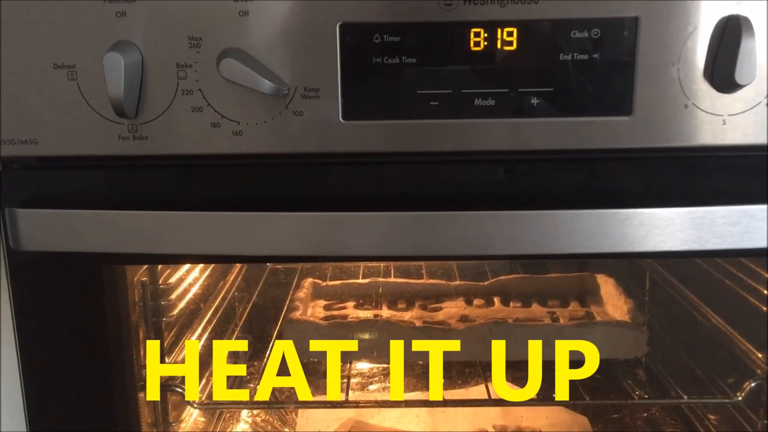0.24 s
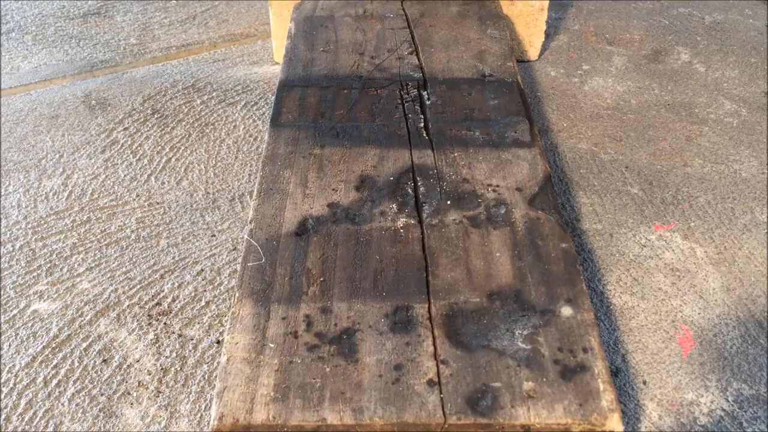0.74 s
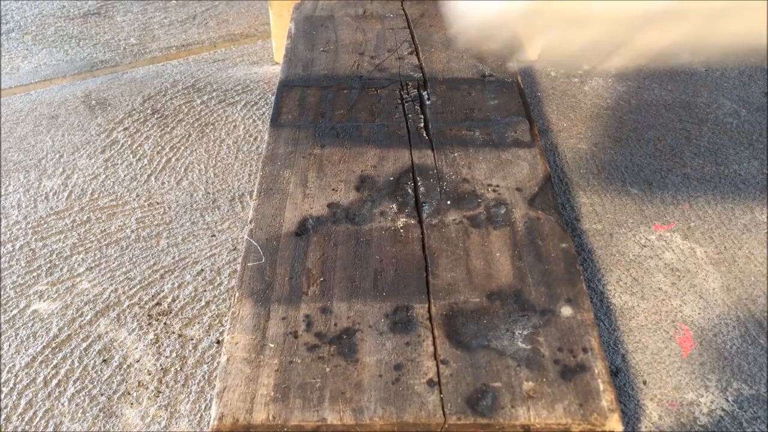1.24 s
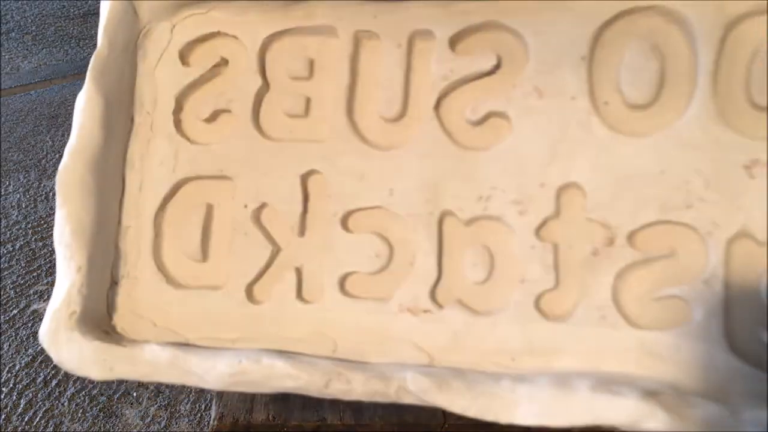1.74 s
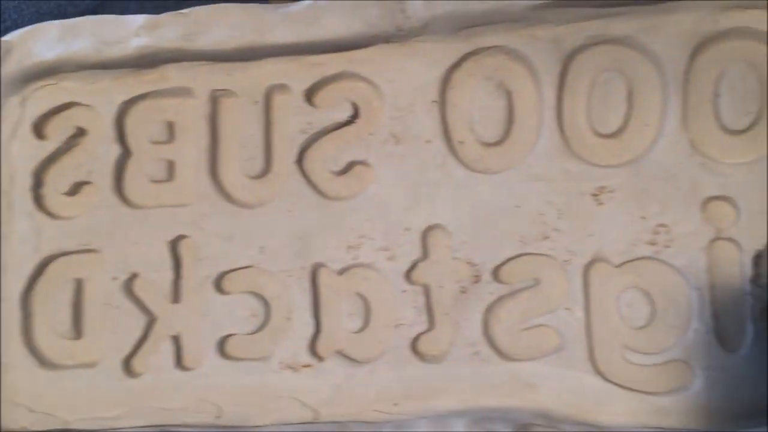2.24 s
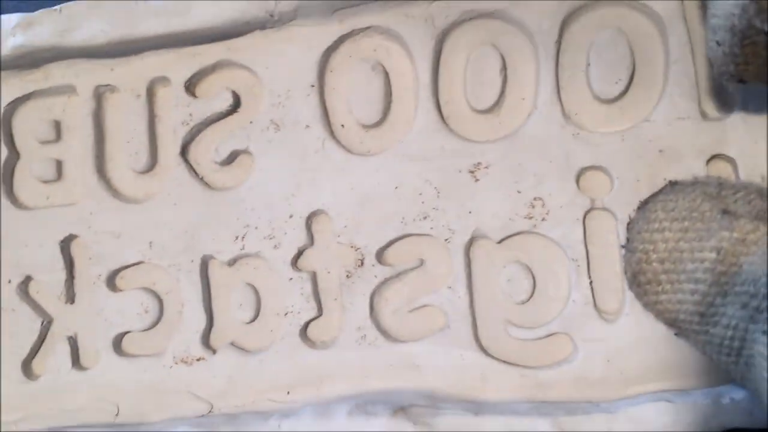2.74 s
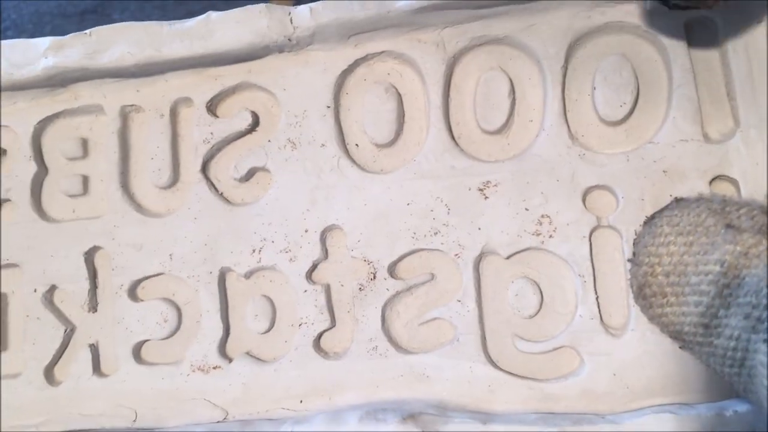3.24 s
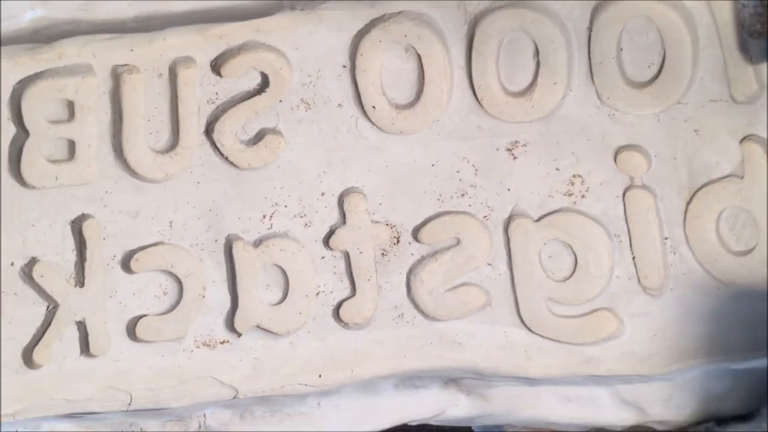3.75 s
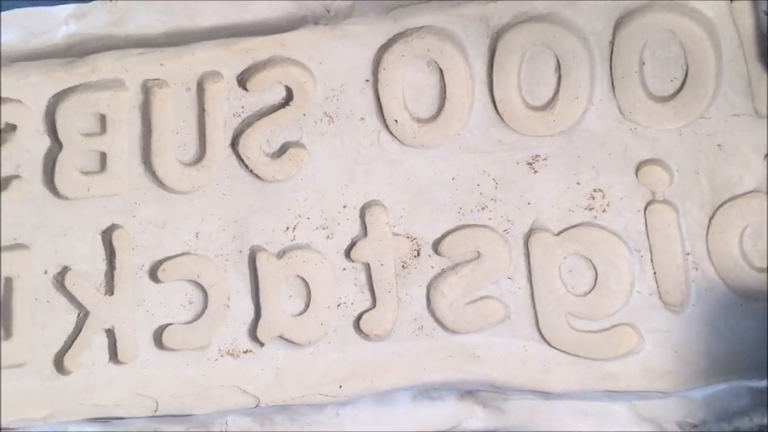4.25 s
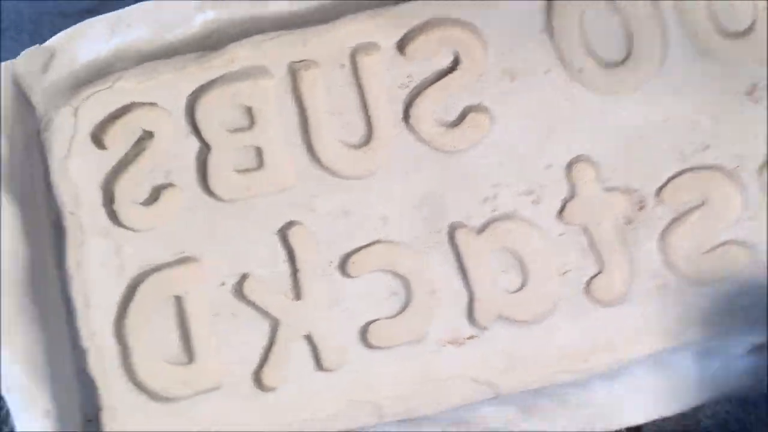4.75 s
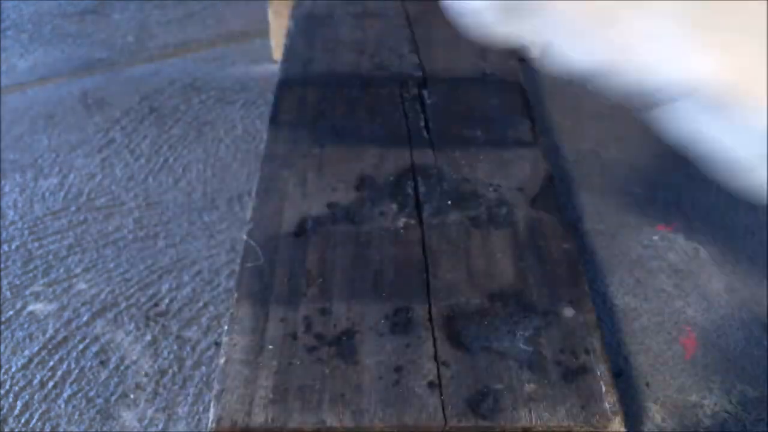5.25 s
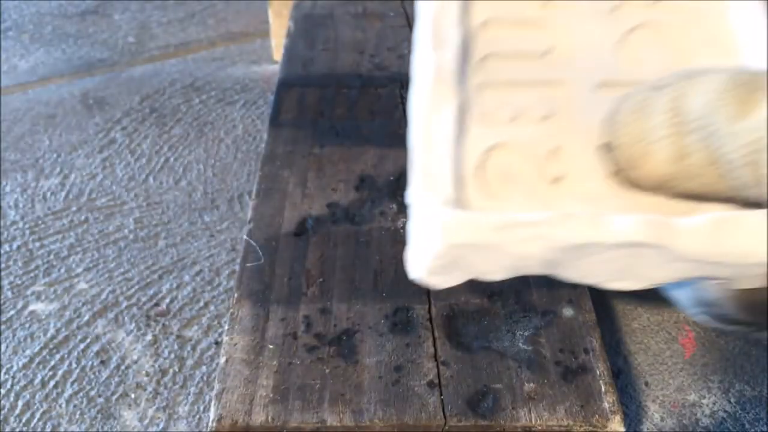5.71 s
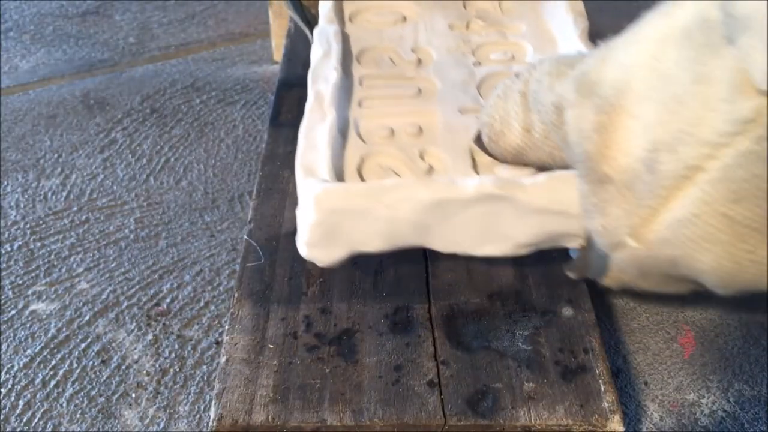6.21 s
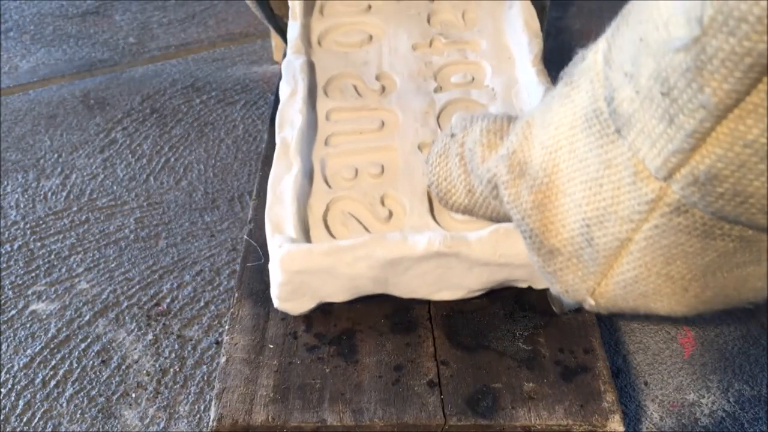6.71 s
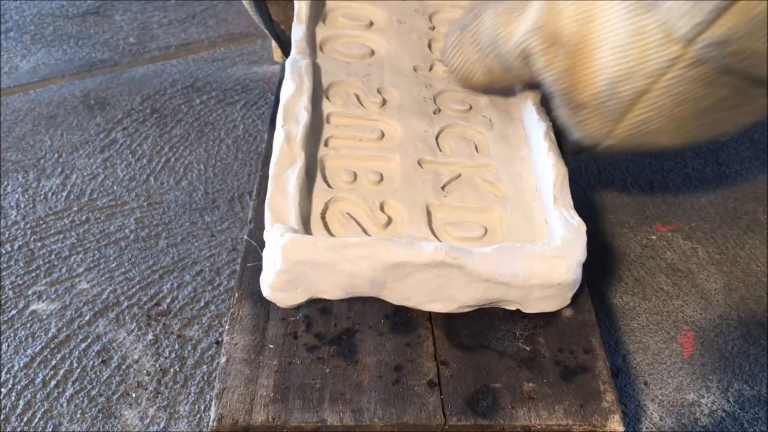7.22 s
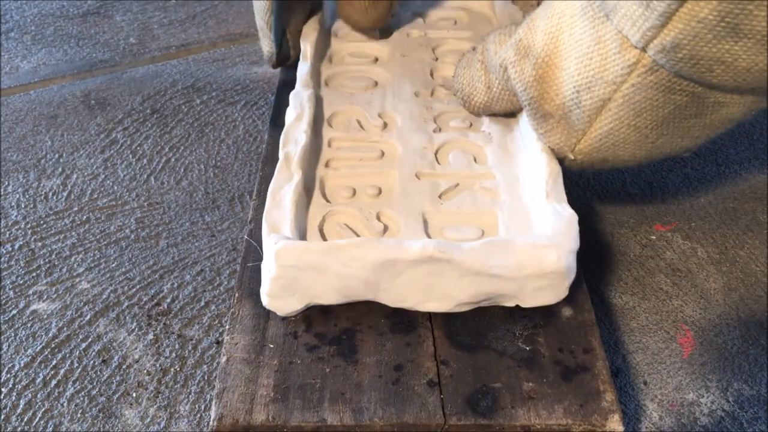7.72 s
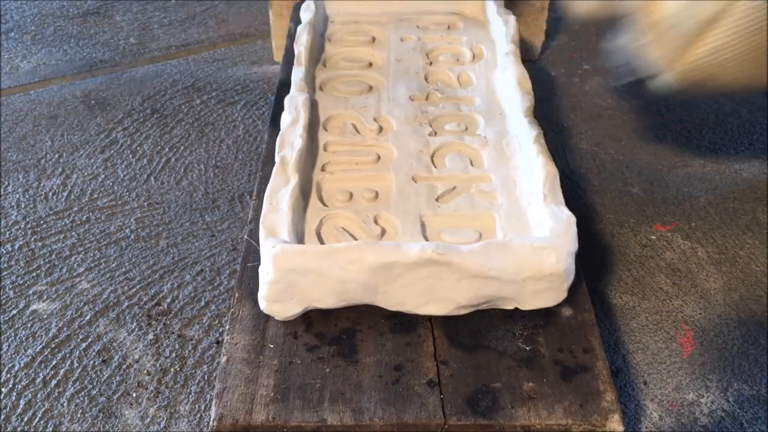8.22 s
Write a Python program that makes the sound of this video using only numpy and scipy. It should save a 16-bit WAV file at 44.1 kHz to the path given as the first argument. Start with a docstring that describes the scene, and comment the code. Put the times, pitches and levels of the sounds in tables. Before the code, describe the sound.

After a brief oven fan hum, a gas burner suddenly roars and hisses steadily, while a clay mould is set lightly on wood.

```python
"""A kitchen oven hums quietly, its fan moving air, with one soft bump. After an abrupt cut, a gas
burner roars in a melting furnace outdoors: the flame booms in the furnace chamber while the gas jet
hisses through the ringing burner tube. A clay mould is carried past the microphone, shading and
colouring the hiss, and is set down on a plank with a light knock."""
import sys
import numpy as np
from scipy import signal
from scipy.fft import rfft, irfft
from scipy.io import wavfile

SR = 44100
rng = np.random.default_rng(int(sys.argv[2]) if len(sys.argv) > 2 else 0)


def int16_out(signal):
    """Quantize to a 16-bit WAV file."""
    q = np.round(np.clip(np.atleast_2d(signal).T, -1, 1) * 32767)
    wavfile.write(sys.argv[1], SR, q.astype(np.int16))


N = 373527
TIME = np.arange(N) / SR
FREQS = np.fft.rfftfreq(N, 1 / SR)

CROSSOVER_HZ, TOP_HZ = 850, 7000  # where flame gives way to jet; where the top of the hiss begins
MOVE_S = .53  # time to lift or lower the mould


def amp(db):
    """Decibels to gain."""
    return 10 ** (np.asarray(db) / 20)


def unit_rms(x):
    """Scales a signal to rms 1."""
    return x / np.sqrt(np.mean(x ** 2) + 1e-20)


def contour_db(points):
    """A spectrum drawn in straight lines on a log-frequency axis."""
    hz, db = np.transpose(points)
    return np.interp(np.log(FREQS + 1), np.log(hz + 1), db)


def lift_db(modes):
    """Bell-shaped peaks that resonances raise on a spectrum."""
    return sum(db / (1 + (2 * (FREQS - hz) / width) ** 2) for hz, width, db in modes)


def above(hz, edge_hz, order=8):
    """Share of each frequency that lies above a soft crossover."""
    return 1 - 1 / (1 + (hz / edge_hz) ** order)


def noise(gain):
    """Noise of rms 1 with the given spectrum."""
    return unit_rms(irfft(rfft(rng.standard_normal(N)) * gain, N))


def wander(rate_hz):
    """A random drift of rms 1, moving at up to the given rate."""
    return noise(1 - above(FREQS, rate_hz, order=4))


def during(start, end, ramp_s):
    """Fades from 0 to 1 around start and back around end."""
    return np.clip(.5 + np.minimum(TIME - start, end - TIME) / ramp_s, 0, 1)


def oven():
    """The kitchen bed: slightly wavering fan tones over moving air, and one soft, low bump."""
    # Fan and mains hum. Each row: pitch in Hz, rms level in dB.
    hum_tones = [(118.4, -62.5), (199.2, -52.5), (328.4, -61), (656.8, -77), (979.8, -72.5), (1314, -77),
                 (1637, -77.5), (1965, -88)]
    # Air moved by the fan. Each row: frequency in Hz, relative spectral level in dB.
    air_spectrum = [(25, -15), (60, 2.5), (110, 3), (167, -5), (250, -13), (350, -11), (543, -23.5),
                    (900, -25), (1320, -27), (2500, -36), (4500, -42.5), (9000, -49), (15500, -53)]
    wavering_time = np.cumsum(1 + .001 * wander(8)) / SR
    hum = sum(np.sqrt(2) * amp(db) * np.sin(2 * np.pi * (hz * wavering_time + rng.random()))
              for hz, db in hum_tones)
    hum *= amp(1.8 * wander(6))
    air = amp(-47.5) * noise(amp(contour_db(air_spectrum)))
    bump_at_s, bump_hz, bump_width_s = .058, 64, .013
    t = TIME - bump_at_s
    bump = amp(-29.5) * np.exp(-(t / bump_width_s) ** 2) * np.cos(2 * np.pi * bump_hz * t)
    return hum + air + bump


def nozzle_whistle():
    """A narrow, high resonance of the nozzle swells out of the hiss once."""
    hz, width_hz = 12980, 200
    whistle = noise(1 / (1 + (2 * (FREQS - hz) / width_hz) ** 2))
    return amp(-59) * during(6.65, 7.6, MOVE_S / 2) * whistle


def mould_knocks():
    """Each touch rings the same short, dull modes of the clay; the wood softens the attack."""
    # Modes of the clay mould. Each row: pitch in Hz, relative level in dB, seconds to fall 60 dB.
    clay_modes = [(1238, -1, 0.037), (1340, -11, 0.02), (1970, -16, 0.035), (2650, -14, 0.037),
                  (3601, -23, .03)]
    # The mould touches tongs and plank. Each row: start in seconds, strength in dB.
    touches = [(5.552, -25), (5.598, -31), (7.131, -29), (7.1345, -16)]
    attack_s = .00036
    t = TIME[:SR // 8]
    ring = sum(amp(db - 60 * t / t60) * np.sin(2 * np.pi * hz * t) for hz, db, t60 in clay_modes)
    ring *= 1 - np.exp(-t / attack_s)
    blows = np.zeros(N)
    for start, db in touches:
        blows[round(start * SR)] = amp(db)
    return signal.oaconvolve(blows, ring)[:N]


def yard_echoes(x, wet_db, t60):
    """Sparse echoes from ground and walls comb the steady sound."""
    echoes_per_s = 2000
    t = TIME[:SR // 2]
    taps = rng.standard_normal(len(t)) * (rng.random(len(t)) < echoes_per_s / SR)
    taps *= amp(-60 * t / t60)
    echoes = signal.fftconvolve(x, taps / np.linalg.norm(taps))[:N]
    return unit_rms(x + amp(wet_db) * echoes)


def mould_echo(x):
    """A short echo off the mould combs the hiss, flipping polarity while it is held up close."""
    delay_s, gain_held, gain_away = .00058, .11, -.079
    gain = gain_away + (gain_held - gain_away) * during(2.2, 4.8, MOVE_S)
    return x + gain * np.roll(x, round(delay_s * SR))


def glove_echoes(x):
    """Moving gloves and arms throw faint short echoes that come and go."""
    delays = rng.integers(15, 160, size=8)  # samples
    return x + sum(.065 * wander(rate_hz=1) * np.roll(x, delay) for delay in delays)


def mould_shadow(x):
    """Mould and gloves pass between burner and microphone and dull the hiss."""
    # The moving shadow. Each row: time in seconds, loss at TOP_HZ in dB.
    shadow = [(1.25, 0.5), (1.55, 3.5), (2.3, 2), (4.1, 3), (4.75, 2), (5.1, 4), (5.6, .9), (6.05, 3.5),
              (6.5, 4), (7.15, 2), (8.0, 4.5)]
    hz, t, spectra = signal.stft(x, SR, nperseg=256)
    tilt = (hz / TOP_HZ) ** .57  # short waves bend round an obstacle less
    loss_db = np.outer(tilt, np.interp(t, *np.transpose(shadow)))
    return signal.istft(spectra * amp(-loss_db), SR, nperseg=256)[1][:N]


def treble_dips(x):
    """The treble ducks for a few hundredths of a second, at set moments and more lightly at random."""
    # The set dips. Each row: centre in seconds, length in seconds, depth in dB.
    set_dips = [(2.515, .018, 11), (3.283, .016, 9), (3.498, .016, 7), (4.222, 0.016, 11),
                (4.984, 0.036, 13), (6.333, .017, 11), (7.428, .03, 13), (7.848, .017, 12),
                (7.997, 0.021, 7), (8.4, 0.014, 8)]
    flickers_per_s, flicker_s, flicker_db = .9, .018, 6.4
    hz, t, spectra = signal.stft(x, SR, nperseg=256)
    flicker_times = t[rng.random(len(t)) < flickers_per_s * t[1]]
    dips = set_dips + [(centre, flicker_s, flicker_db) for centre in flicker_times]
    depth_db = sum(db * np.exp(-(2 * (t - centre) / length) ** 4) for centre, length, db in dips)
    loss_db = np.outer(above(hz, edge_hz=3300), depth_db)
    return signal.istft(spectra * amp(-loss_db), SR, nperseg=256)[1][:N]


def gas_jet():
    """The gas jet rings the burner tube: a fluttering hiss, coloured on its way to the microphone."""
    # Jet noise. Each row: frequency in Hz, relative spectral level in dB.
    jet_spectrum = [(850, -6.4), (1400, -8.2), (1800, 0.0), (2100, -15.5), (2600, -9.1), (3300, -9.9),
                    (3900, -16.9), (5300, -20.7), (7800, -22.9), (11000, -22.9), (14000, -25.7),
                    (15400, -25.0)]
    # Resonances of tube and nozzle. Each row: centre in Hz, width in Hz, lift in dB.
    tube_modes = [(1214, 146, 8.2), (1594, 27, 9.6), (1652, 56, 10.4), (1764, 33, 2.7), (1848, 28, 6.5),
                  (2356, 89, 3.0), (2520, 70, 14.6), (3004, 103, 6.8), (3522, 210, 7.7), (4121, 125, 13.0),
                  (4687, 305, 9.6), (5130, 131, 6.5), (5633, 180, 17.0), (6502, 390, 9.7), (7211, 414, 5.4),
                  (8707, 450, 8.0), (9502, 130, 3.1), (10675, 764, 4.2), (12265, 105, 5.2),
                  (12974, 300, 9.5), (13303, 210, 6.6)]
    body_db, top_relative_db, flutter_db = -37.5, -10, .5  # rms, ahead of shadow and dips
    low_cut = np.sqrt(above(FREQS, CROSSOVER_HZ, order=24))
    rush = noise(amp(contour_db(jet_spectrum) + lift_db(tube_modes)) * low_cut)
    rush = yard_echoes(rush, wet_db=-8, t60=.3)
    rush *= amp(flutter_db * wander(31))
    rush = glove_echoes(mould_echo(rush))
    top = irfft(rfft(rush) * above(FREQS, TOP_HZ), N)
    hiss = amp(body_db) * (unit_rms(rush - top) + amp(top_relative_db) * unit_rms(top))
    return treble_dips(mould_shadow(hiss))


def flame():
    """Turbulent combustion booms in the chamber; unsteady flow adds quick flutter and a slow swell."""
    # Combustion noise. Each row: frequency in Hz, relative spectral level in dB.
    flame_spectrum = [(20, -30.4), (42, -24.7), (58, -10.2), (130, -3.4), (200, 0.0), (390, -0.5),
                      (435, -15.0), (600, -18.2), (850, -30.0)]
    # Resonances of the chamber and its surroundings. Each row: centre in Hz, width in Hz, lift in dB.
    chamber_modes = [(68, 10, 4.8), (95, 21, 8.0), (140, 18, 5.8), (163, 25, 9.9), (180, 8, 8.3),
                     (226, 24, 5.9), (250, 20, 8.4), (286, 27, 6.6), (340, 24, 8.4), (365, 19, 6.8),
                     (407, 27, 9.3), (450, 13, 8.8), (474, 20, 10.7), (492, 9, 7.3), (527, 7, 4.1),
                     (575, 21, 8.2), (701, 36, 6.1), (746, 10, 5.5), (793, 22, 6.6)]
    roar_db, flutter_db, swell_db = -16.5, .6, .43  # rms
    high_cut = np.sqrt(1 - above(FREQS, CROSSOVER_HZ, order=24))
    boom = noise(amp(contour_db(flame_spectrum) + lift_db(chamber_modes)) * high_cut)
    unsteady_db = flutter_db * wander(48) + swell_db * wander(3)
    return amp(roar_db) * unit_rms(boom * amp(unsteady_db))


def scene():
    """The kitchen, a blink of silence, then the furnace cuts in with a snap."""
    kitchen_end_s, furnace_start_s, snap_decay_s = .703, .769, .001
    snap = amp(-10) * np.exp(-abs(TIME - furnace_start_s) / snap_decay_s)
    furnace = flame() + gas_jet() + nozzle_whistle() + mould_knocks() + snap
    kitchen = during(.002, kitchen_end_s, ramp_s=.004) * oven()
    return (kitchen + (TIME >= furnace_start_s) * furnace)[None]


def record(dry):
    """A steep low-pass trims the very top of the sound."""
    low_pass = signal.firwin(1023, cutoff=15800, window=("kaiser", 9), fs=SR)
    return signal.oaconvolve(dry, low_pass[None], "same")


dry = scene()
out = record(dry)
int16_out(out)
```